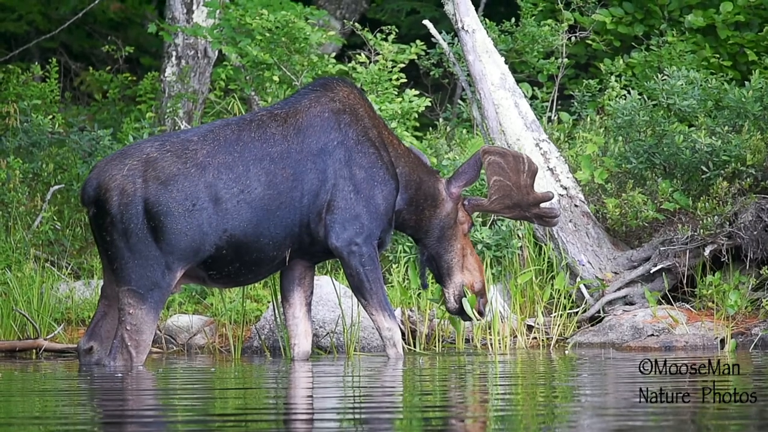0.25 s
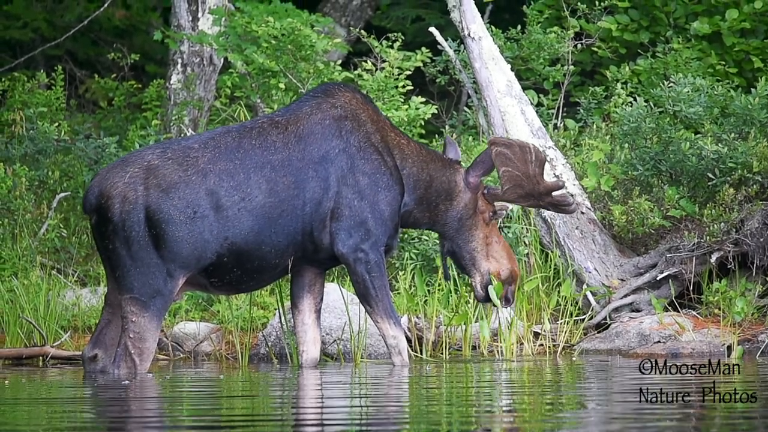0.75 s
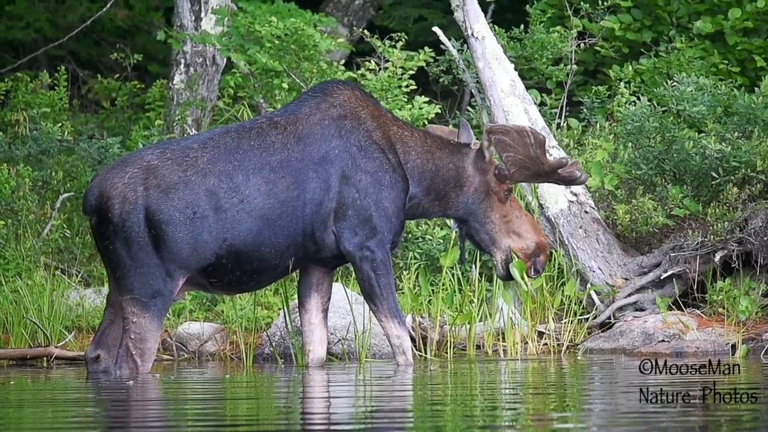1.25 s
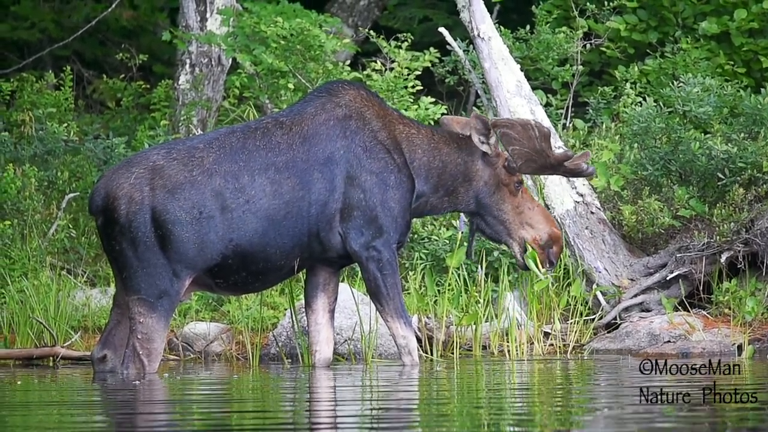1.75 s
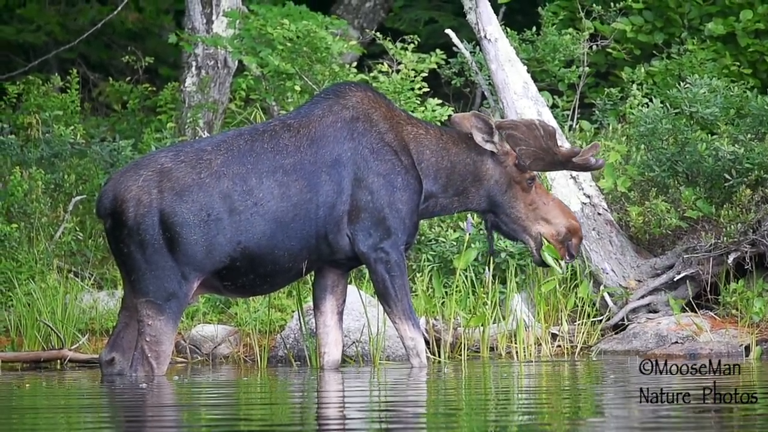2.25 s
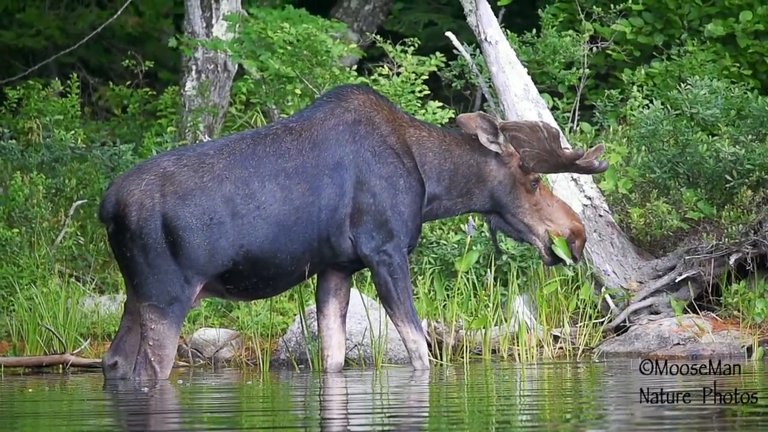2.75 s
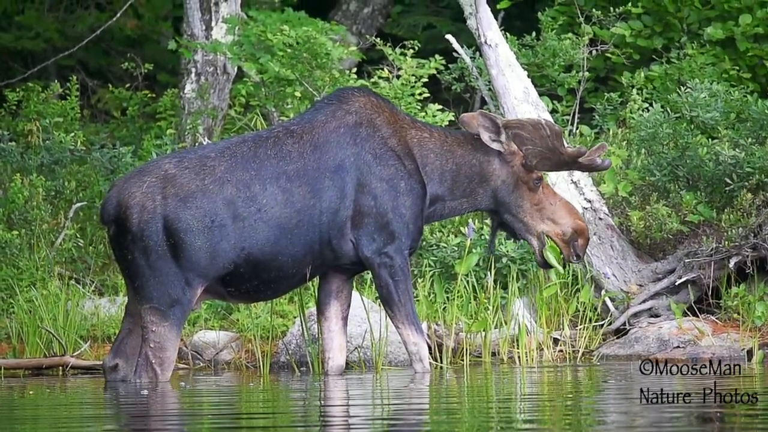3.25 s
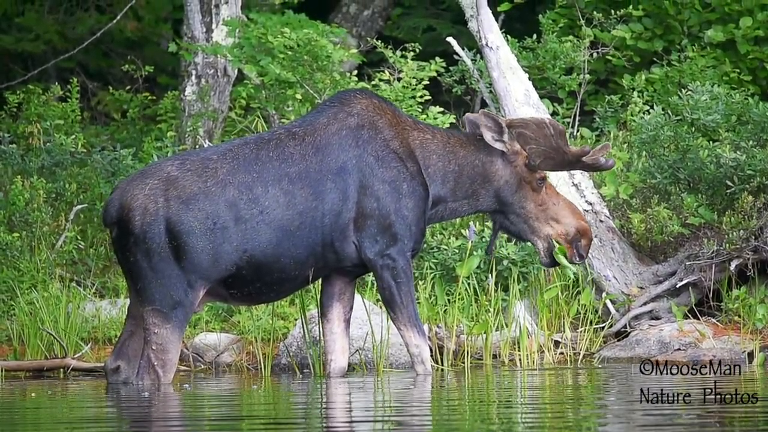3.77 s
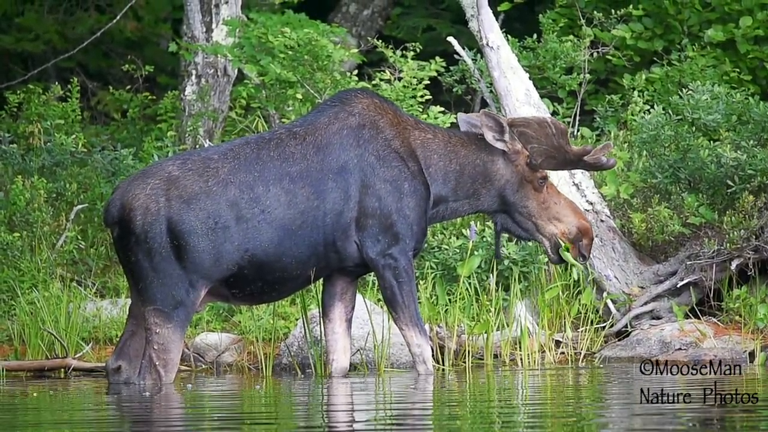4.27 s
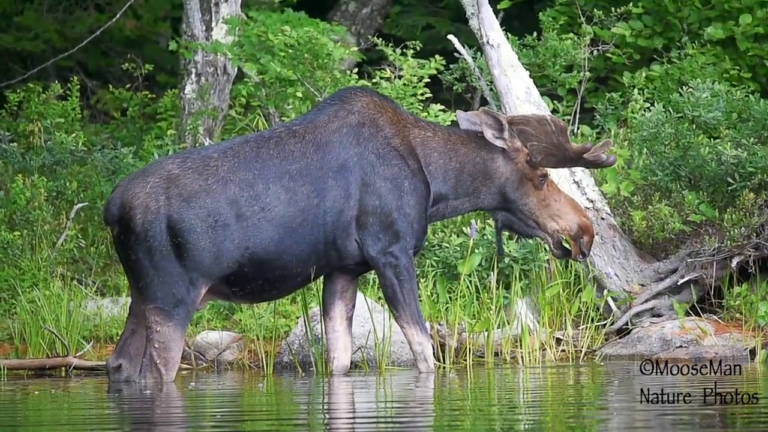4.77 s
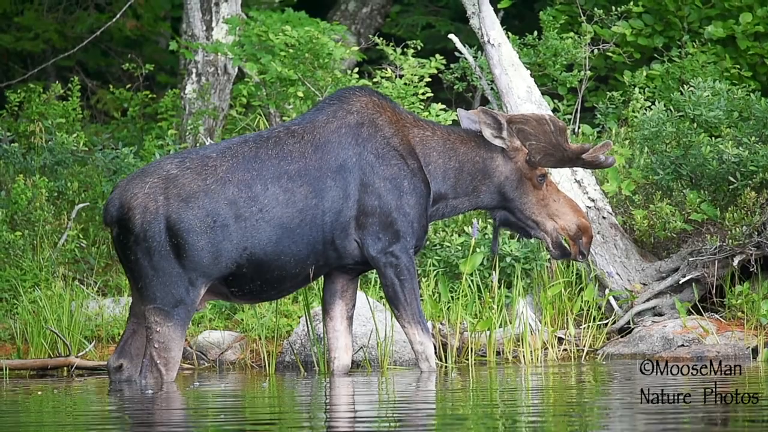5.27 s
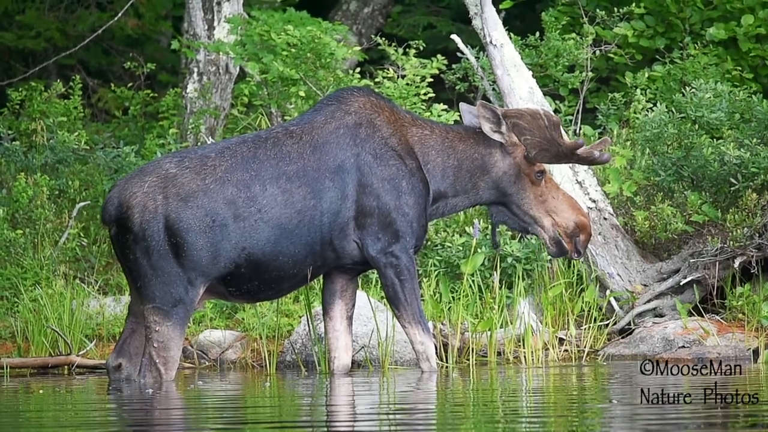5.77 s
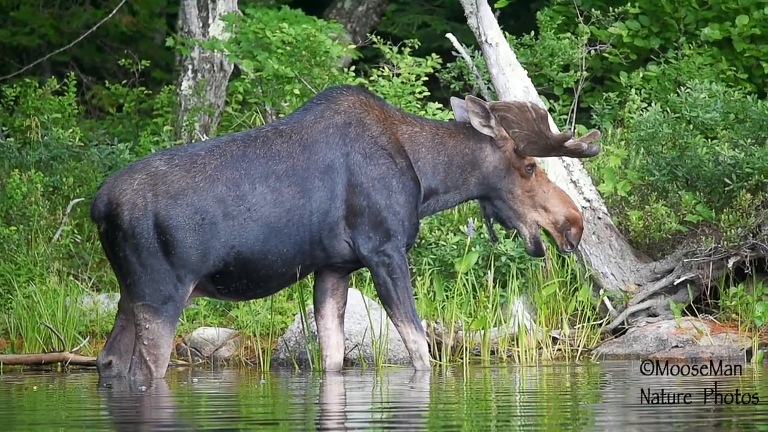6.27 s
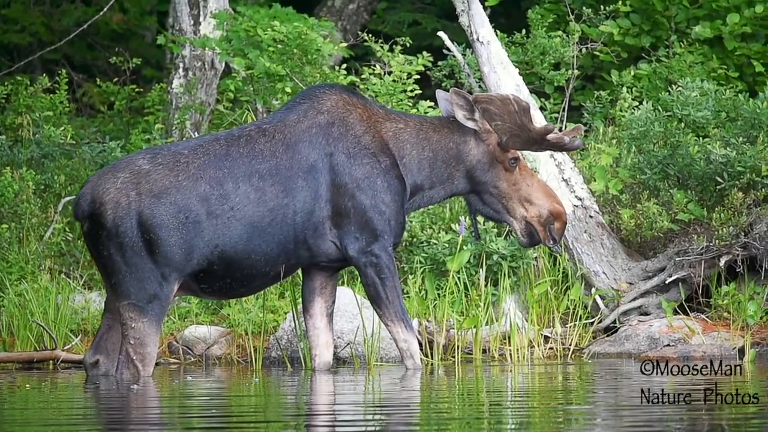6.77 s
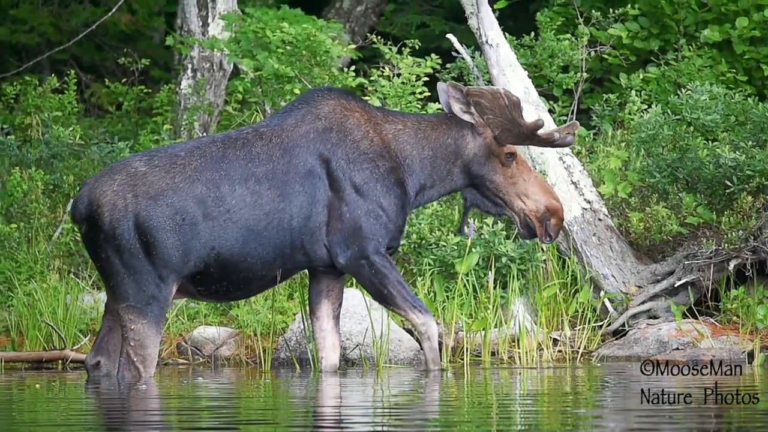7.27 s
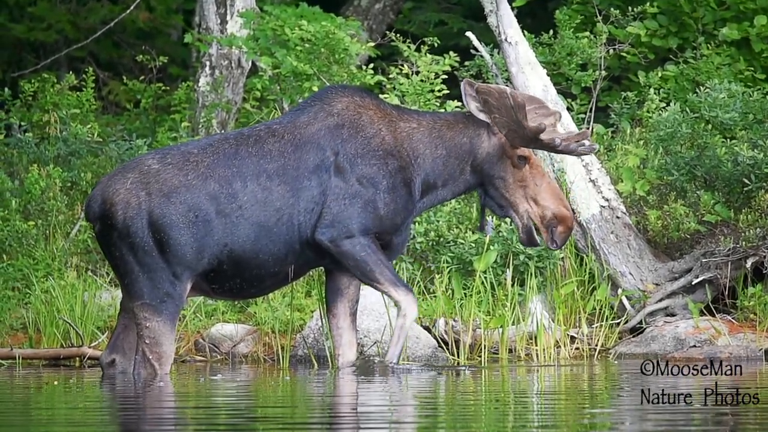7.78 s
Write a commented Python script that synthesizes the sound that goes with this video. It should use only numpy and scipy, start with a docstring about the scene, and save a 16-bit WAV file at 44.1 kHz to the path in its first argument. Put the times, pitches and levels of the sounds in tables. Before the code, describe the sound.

A soft breeze hisses and rumbles around a wooded lake. A feeding moose snaps and tears wet plants, water dripping from its muzzle, while small songbirds chirp far off. A loon then gives two loud quavering calls, one right after the other, and the shores echo them for seconds. The faint feeding and chirping go on until the moose takes a gently splashing, bubbling step at the end.

```python
"""A soft breeze hisses and rumbles around a lake. A wading moose snaps and tears water plants and drips
from its muzzle, while small songbirds chirp far off. After some two and a half seconds a loon gives two
tremolo calls: each opens in a low reedy register, breaks up into a pure quaver and drops back.
The wooded shores return the calls and ring for seconds. At last the moose takes a splashing step."""
import sys
import numpy as np
from scipy import signal
from scipy.fft import rfft, irfft, next_fast_len
from scipy.io import wavfile
from scipy.ndimage import uniform_filter1d

SR = 44100
rng = np.random.default_rng(int(sys.argv[2]) if len(sys.argv) > 2 else 0)


def to_wav(sig):
    """Store sig (one row per channel, or 1-D mono) as 16-bit WAV at the path in sys.argv[1].

    Samples outside -1..1 are clipped; the rate is SR.
    """
    pcm = np.clip(np.atleast_2d(sig), -1, 1) * 32767
    pcm = np.round(pcm).astype(np.int16)
    wavfile.write(sys.argv[1], SR, pcm.T)  # frames by channels


N = 354123
T = np.arange(N) / SR


def undb(db):
    """Decibels to gain."""
    return 10 ** (np.asarray(db) / 20)


def unit(x):
    """Scale to rms 1."""
    return x / np.sqrt(np.mean(x ** 2) + 1e-20)


def decay(t, t60):
    """An envelope that falls 60 dB in t60 seconds."""
    return np.exp(-np.log(1000) * t / t60)


def add(out, start, x):
    """Mix a short sound in at a start time in seconds."""
    i = max(int(start * SR), 0)
    out[i:i + len(x)] += x[:max(N - i, 0)]


def colour(x, points):
    """Equalise along a curve of (frequency [Hz], gain [dB]) points."""
    hz, db = np.transpose(points)
    size = next_fast_len(len(x))
    bin_hz = np.arange(size // 2 + 1) * SR / size
    gain = undb(np.interp(np.log(bin_hz + 1), np.log(hz), db))
    return irfft(rfft(x, size) * gain, size)[:len(x)]


def drift(rate_hz):
    """Smooth random modulation with a spread near 1."""
    hold = max(int(SR / rate_hz), 1)
    steps = np.repeat(rng.standard_normal(N // hold + 1), hold)
    return unit(uniform_filter1d(steps, hold))[:N]


def crackle(samples, per_s, spread_db):
    """Random tiny clicks of unequal size."""
    hits = rng.random(samples) < per_s / SR
    clicks, size = rng.standard_normal((2, samples))
    return unit(hits * clicks * undb(spread_db * np.clip(size, -2, 2)))


def breeze(hiss_db=.2, rumble_db=1.6, flicker_db=.5, buffet_db=1.5, settle_db_per_s=.15):
    """Smooth far leaf hiss above a rumble that buffets a little and slowly settles."""
    # wind in the forest: (frequency [Hz], gain [dB])
    forest_eq = [(15, -34), (25, -4.5), (49, -2), (102, 1.5), (145, -3), (195, -2.5), (416, -13),
                 (659, -12.5), (962, -15.5), (1230, -15.5), (1700, -19.5), (2910, -21), (11600, -38),
                 (14800, -44), (16000, -51.5)]
    air = undb(-44.5) * unit(colour(rng.standard_normal(N), forest_eq))
    lows = colour(air, [(200, -5), (350, .5), (700, -23.5), (2000, -94.5)])
    rumble = lows * undb(rumble_db - settle_db_per_s * T + buffet_db * drift(7))
    hiss = (air - lows) * undb(hiss_db + flicker_db * drift(10))
    return rumble + hiss


def songbirds(chirp_s=.056, bow_hz=111, jitter=.0066, reverb_db=-2, reverb_t60=.8):
    """Thin whistled chirps, slightly unsteady and blurred by the trees."""
    # one bird repeats a falling slur: (time [s], level [dB])
    slurs = [(.345, -57), (.5, -56.5), (2.176, -59), (3.555, -61), (3.725, -58.5), (5.14, -64),
             (5.295, -62), (6.14, -61), (6.7, -68), (7.155, -66), (7.32, -68)]
    slur_hz = (5030, 4750, 3870)  # start, middle, end
    # another sings glides, all bowed upward: (time [s], start pitch [Hz], end pitch [Hz], level [dB])
    glides = [(1.38, 4250, 4900, -61), (1.472, 4600, 4080, -55), (1.58, 5130, 5450, -56.5),
              (1.631, 3850, 4720, -53), (1.74, 6060, 6160, -58.5), (1.79, 5700, 5000, -57),
              (1.865, 5080, 4020, -55), (1.935, 5420, 5860, -55.5), (2.015, 5250, 4300, -58),
              (3.926, 6440, 7200, -61.5)]
    notes = [(start, slur_hz, db) for start, db in slurs]
    notes += [(start, (a, (a + b) / 2 + bow_hz, b), db) for start, a, b, db in glides]
    out, u = np.zeros(N), np.linspace(0, 1, int(chirp_s * SR))
    waver = 1 + jitter * drift(400)
    for start, contour, db in notes:
        arc_hz = np.polyval(np.polyfit([0, .5, 1], contour, 2), u)
        hz = arc_hz * waver[int(start * SR):][:len(u)]
        whistle = np.sin(2 * np.pi * np.cumsum(hz) / SR)
        add(out, start, undb(db) * unit(whistle * (u * (1 - u)) ** .25))
    trees = rng.standard_normal(SR) * decay(T[:SR], reverb_t60)
    return out + undb(reverb_db) * signal.fftconvolve(out, trees / np.linalg.norm(trees))[:N]


def knocks(skirt_db=-18):
    """Dull, heavily damped thuds from the feeding moose, each a broad band of noise."""
    # (time [s], pitch [Hz], peak level [dB], t60 [s])
    thuds = [(1.699, 1150, -33, 0.034), (1.946, 1090, -31.5, 0.023), (3.642, 275, -32.5, 0.1),
             (5.244, 343, -34.5, 0.16), (5.439, 1200, -46, .068)]
    out, t = np.zeros(N), T[:SR // 5]
    for start, hz, db, t60 in thuds:
        band = [(hz / 4, 2 * skirt_db), (hz / 2, skirt_db), (hz, 0),
                (hz * 2, skirt_db), (hz * 8, 3 * skirt_db)]
        body = colour(rng.standard_normal(len(t)), band) * decay(t, t60)
        add(out, start, undb(db) * body / np.abs(body).max())
    return out


def snapping_stems(trim_db=-2, bright_db=13):
    """A stem breaks with one hard tick and a faint splintering."""
    # (time [s], relative peak level [dB], relative treble [dB])
    snaps = [(.156, -31, -23), (.595, -28, -9), (0.6274, -30, -23), (.772, -30.5, -25), (1.0001, -34, -20),
             (2.934, -32, -29), (3.4212, -25.5, -23), (3.5009, -31, -36), (4.146, -30, -21),
             (4.1554, -29, -25), (4.6972, -35, -29), (7.875, -27, -29)]
    out, t = np.zeros(N), T[:1024]
    envelope = np.exp(-t / .0009) + .15 * np.exp(-t / .005)
    for start, db, treble in snaps:
        top = treble + bright_db
        eq = [(400, -12), (1500, 0), (4000, 0), (8000, .75 * top - 6),
              (13000, top - 1), (16000, top - 11)]
        crack = envelope * colour(rng.standard_normal(len(t)), eq)
        add(out, start, undb(db + trim_db) * crack / np.abs(crack).max())
    return out


def tearing_plants():
    """Each mouthful of wet plants tears in a run of tiny cracks."""
    # (time [s], length [s], level [dB], treble [dB])
    tears = [(0.228, 0.064, -55, -14), (0.589, 0.15, -50, -6.5), (0.742, 0.09, -57, -8),
             (1.479, 0.32, -56.5, -18), (4.553, 0.056, -62, 3), (4.678, .11, -51.5, -11.5),
             (5.431, 0.041, -54, -27), (5.758, 0.078, -60, -11)]
    out = np.zeros(N)
    for start, length, db, treble in tears:
        u = np.linspace(0, 1, int(length * SR))
        eq = [(400, -20), (1400, 2), (4000, -1), (8500, treble - 5),
              (12300, treble), (15500, treble - 16)]
        cracks = colour(crackle(len(u), per_s=2500, spread_db=6.3), eq)
        add(out, start, undb(db) * unit(cracks * u ** .26 * (1 - u) ** 1.1))
    return out


def bubble(hz, cycles, rise):
    """An air pocket rings for a set number of cycles, its pitch climbing as it nears the surface."""
    t60 = cycles / hz
    t = np.arange(int(t60 * SR)) / SR
    ring = np.sin(2 * np.pi * hz * t * (1 + rise * t / t60 / 2))
    return ring * decay(t, t60) * (1 - np.exp(-t / .0002))


def drips():
    """Drops from the muzzle plink into the lake; large bubbles plop around the step."""
    # (time [s], pitch [Hz], peak level [dB])
    drops = [(.25, 1384, -38.5), (.859, 2200, -40), (1.018, 3260, -31), (1.243, 1430, -38),
             (2.103, 4180, -32), (3.199, 1004, -36.5), (7.485, 794, -41), (7.714, 2100, -39),
             (7.785, 949, -27), (7.8, 890, -29.5), (7.815, 1046, -31), (7.851, 1410, -32),
             (7.868, 570, -33.5)]
    out = np.zeros(N)
    for start, hz, db in drops:
        add(out, start, undb(db) * bubble(hz, cycles=69, rise=.12))
    return out


def splashing_step(trim_db=-3, bubbles=160):
    """The moose's leg stirs up spray and a fizz of small bubbles."""
    # the leg lifts, swings and plunges: (peak time [s], relative level [dB], rise [s], decay [s])
    surges = [(7.495, -47, .02, 0.033), (7.605, -48.5, .04, 0.045), (7.77, -41, 0.11, 0.98)]
    # tone of the spray: (frequency [Hz], gain [dB])
    spray_eq = [(250, -10), (550, -3), (1000, -0.5), (1800, -9.5), (3000, -13), (6000, -23.5),
                (12000, -30.5), (16000, -38)]
    fizz, onset = np.zeros(N), surges[0][0] - surges[0][2]
    for when, height, softness in rng.random((bubbles, 3)):
        ping = bubble(500 * 7 ** height, cycles=45, rise=.15)
        add(fizz, onset + when * (T[-1] - onset), undb(-12 * softness - 6.8 * height) * ping)
    fizz /= np.std(fizz[T > onset])
    spray = unit(colour(crackle(N, per_s=2500, spread_db=1.8), spray_eq))
    stir = sum(undb(db) * np.exp(-np.maximum((peak - T) / rise, (T - peak) / fall))
               for peak, db, rise, fall in surges)
    return undb(trim_db) * stir * (spray + fizz)


def reflections(delay, db, t60):
    """A dense cloud of reflections that starts after a pre-delay and dies away."""
    t = T[:5 * SR]
    cloud = rng.standard_normal(len(t)) * (t > delay) * decay(np.maximum(t - delay, 0), t60)
    return undb(db) * cloud / np.linalg.norm(cloud)


def shores(call):
    """Near trees scatter at once; the far shore answers, the basin rings on, a ridge replies last."""
    # distant returns: (pre-delay [s], level before EQ [dB], t60 [s])
    echoes = [(.3, -23, .25), (.33, -21.5, 2.0), (.35, -24, 8), (2.47, -36, .5)]
    # air and foliage swallow their treble: (frequency [Hz], gain [dB])
    distance_eq = [(800, 0), (1100, 11), (1180, 6), (1260, 1), (1350, -2.5), (1650, -6), (2600, -10),
                   (6000, -22)]
    far = colour(sum(reflections(*echo) for echo in echoes), distance_eq)
    near = reflections(delay=.01, db=-35, t60=.6)
    return signal.fftconvolve(call, near + far)[:N]


def rasp(call, below_voice_db=33, follow_s=.008):
    """Air rushes through the loon's throat in step with its voice."""
    throat_eq = [(350, -31), (560, -11.5), (660, 6.5), (830, 1), (1050, -14.5), (1650, 4.5),
                 (2100, -21.5), (2600, -15.5), (4000, -18.5), (9000, -41.5)]
    effort = np.sqrt(np.abs(uniform_filter1d(call ** 2, int(follow_s * SR) + 1)))
    air = unit(colour(rng.standard_normal(N), throat_eq))
    return undb(-below_voice_db) * effort * air


def syrinx(start, hz, db, partials, jitter, shimmer_db, brighten, fade_s, full_effort_db=-17):
    """One slightly unsteady note; the upper overtones fall away faster as the effort sinks."""
    span = int(start * SR) + np.arange(len(hz))
    t = T[span]
    strongest = max(partials, key=lambda partial: partial[1])[0]
    phase = 2 * np.pi * np.cumsum(hz * (1 + jitter * drift(350)[span])) / SR
    tilt_db_per_octave = brighten * (db - full_effort_db)
    tone, out = np.zeros(len(t)), np.zeros(N)
    for harmonic, level_db in partials:
        flicker_db = (level_db < 0) * 1.8 * drift(24.85)[span]  # only the weaker partials
        tilt_db = max(np.log2(harmonic / strongest), 0) * tilt_db_per_octave
        tone += undb(level_db + flicker_db + tilt_db) * np.sin(harmonic * phase)
    fades = np.clip((t - t[0]) / fade_s, 0, 1) * np.clip((t[-1] - t) / fade_s, 0, 1)
    out[span] = unit(tone) * undb(db + shimmer_db * drift(180)[span]) * fades
    return out


def reedy_note(start, hz, db):
    """The rough low register, led by its second harmonic."""
    # (harmonic [number], relative level [dB])
    partials = [(1, -20), (2, 0), (3, -18), (4, -31), (5, -26), (6, -42), (7, -38)]
    return syrinx(start, hz, db, partials, jitter=.007, shimmer_db=.5, brighten=.35, fade_s=.011)


def pure_note(start, hz, db):
    """The clear high register, almost a sine."""
    # (harmonic [number], relative level [dB])
    partials = [(1, 0), (2, -25.5), (3, -33), (4, -46), (5, -60), (6, -58)]
    return syrinx(start, hz, db, partials, jitter=.004, shimmer_db=.4, brighten=.45, fade_s=.002)


def opening(length, hz, db, swings=1.407, sag=.115, flick=.115, db_per_octave=28.5):
    """Pitch and level of the lead-in: a swing, then a flick up to the break; level follows pitch."""
    u = np.linspace(0, 1, int(length * SR))
    bend = 1 - sag * np.cos(np.pi * swings * u) ** 2 + flick * u ** 3
    return hz * bend, db + db_per_octave * np.log2(bend)


def quaver(period, swings, slide_s, crest_hz, crest_db, dip_hz=159.8, dip_db=7.5, fade_db=4.5):
    """Pitch and level of the tremolo: broad crests and narrow dips, then a last fading slide down."""
    t = T[:len(crest_hz)]
    slide = np.maximum(t - swings * period, 0) / slide_s
    dip = np.where(slide > 0, slide ** 2, np.abs(np.sin(np.pi * t / period)) ** 2.6)
    return crest_hz - dip_hz * dip, crest_db - dip_db * dip - fade_db * slide ** 2


def loon(slide_s=.063, close_s=.045):
    """Each call opens low, breaks up into the quaver and drops back for a short, sinking last note."""
    # (time of the upward break [s], quaver period [s], swings [count],
    #  opening length [s], opening pitch [Hz], opening level [dB])
    calls = [(2.567, .0918, 5, .107, 855, -26.5), (3.669, .0890, 6, .139, 812, -29.5)]
    # one arch of effort for each quaver: (time [s], crest pitch [Hz], crest level [dB])
    arches = [
        [(2.62, 1333, -20), (2.79, 1361, -16.5), (2.93, 1311, -22), (3.08, 1254, -25.5)],
        [(3.67, 1285, -22), (3.82, 1357, -16.5), (4.04, 1362, -16.5), (4.26, 1225, -22.5)],
    ]
    out, closing = np.zeros(N), np.linspace(0, 1, int(close_s * SR))
    for (start, period, swings, open_s, open_hz, open_db), arch in zip(calls, arches):
        end = start + swings * period + slide_s
        t = T[int(start * SR):int(end * SR)]
        times, hz, db = np.transpose(arch)
        crest_hz, crest_db = np.interp(t, times, hz), np.interp(t, times, db)
        out += reedy_note(start - open_s, *opening(open_s, open_hz, open_db))
        out += pure_note(start, *quaver(period, swings, slide_s, crest_hz, crest_db))
        out += reedy_note(end, hz=755 - 55 * closing, db=-36 - 7 * closing)
    return out


def scene():
    """The loon and its echoes over songbirds, moose and breeze, in mono."""
    call = loon()
    lead = call + rasp(call) + shores(call)
    birds = songbirds()
    moose = snapping_stems() + tearing_plants() + knocks() + drips() + splashing_step()
    return (lead + birds + moose + breeze())[None]


def record(dry):
    """A steep low-pass takes off the very top."""
    return signal.sosfilt(signal.ellip(10, .1, 90, 15750, fs=SR, output="sos"), dry)


dry = scene()
out = record(dry)
to_wav(out)
```